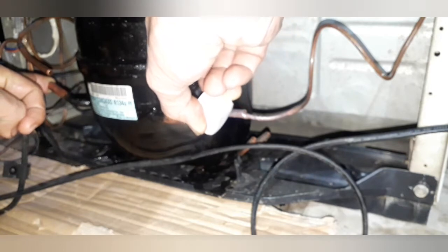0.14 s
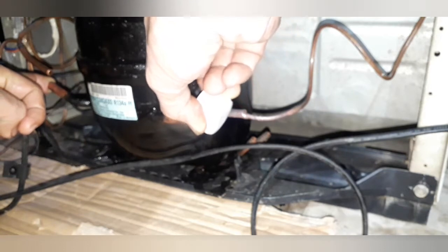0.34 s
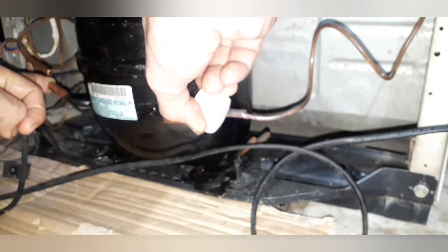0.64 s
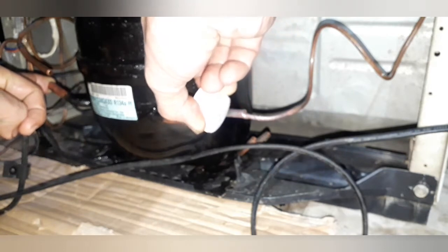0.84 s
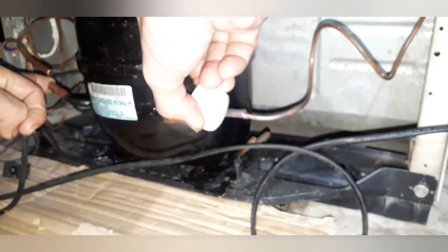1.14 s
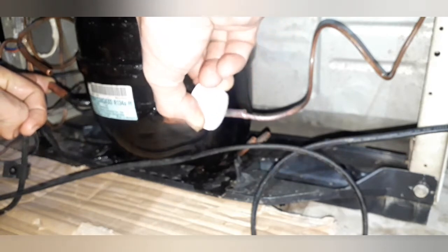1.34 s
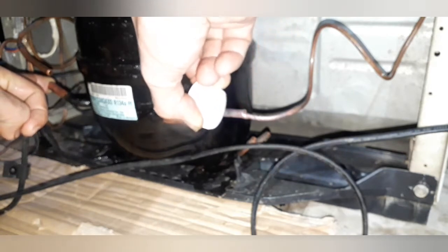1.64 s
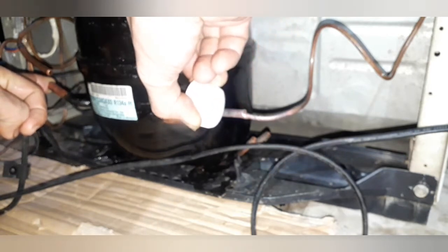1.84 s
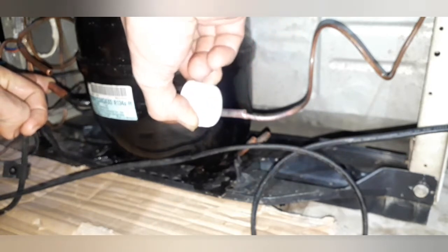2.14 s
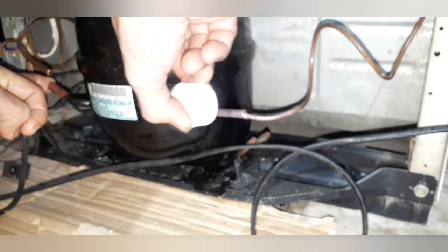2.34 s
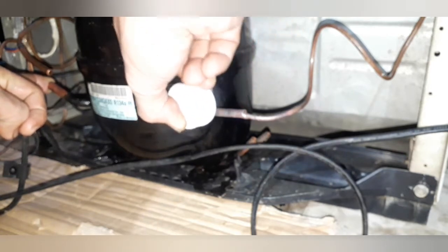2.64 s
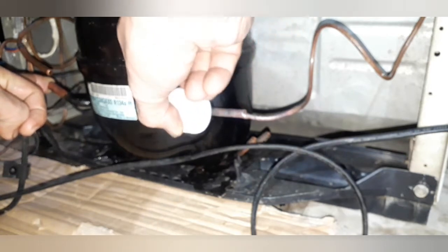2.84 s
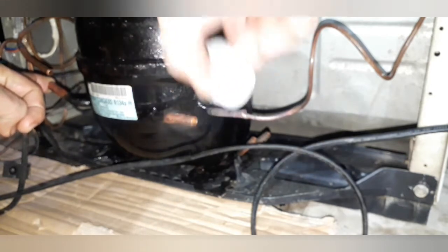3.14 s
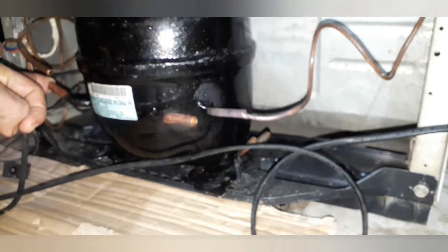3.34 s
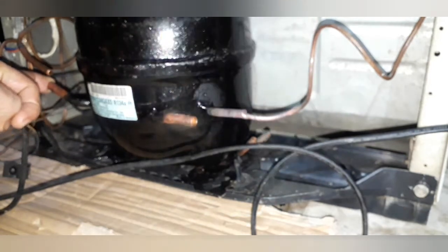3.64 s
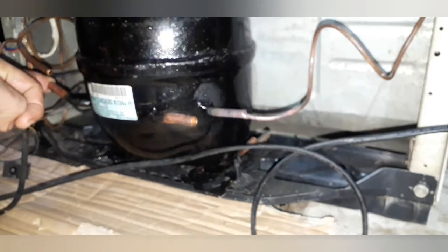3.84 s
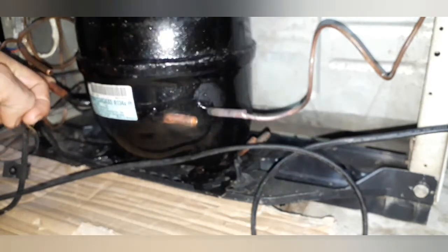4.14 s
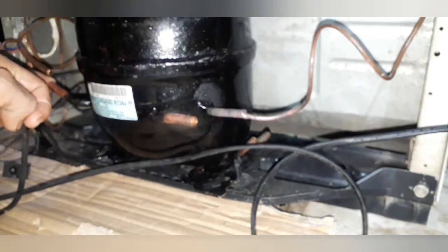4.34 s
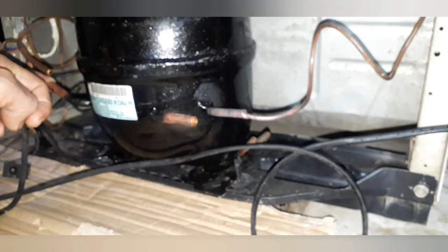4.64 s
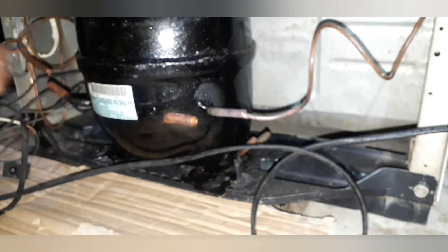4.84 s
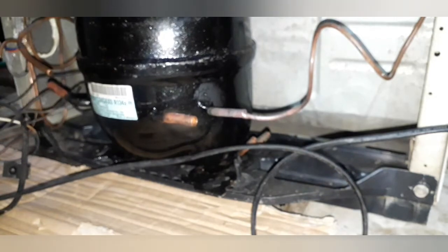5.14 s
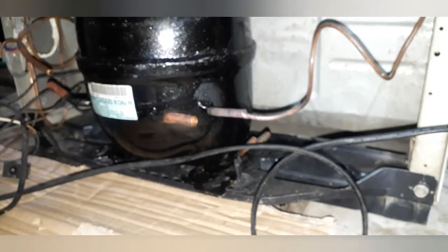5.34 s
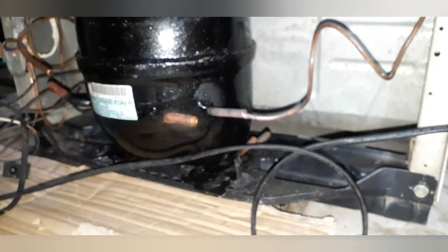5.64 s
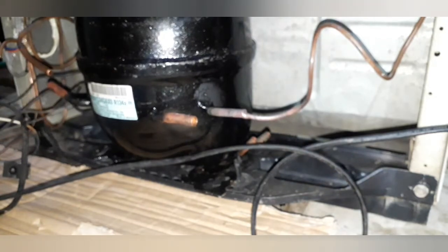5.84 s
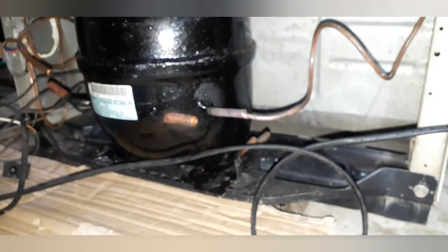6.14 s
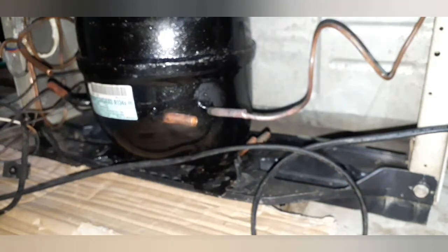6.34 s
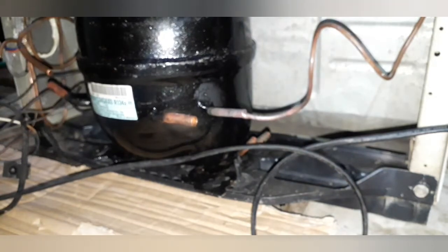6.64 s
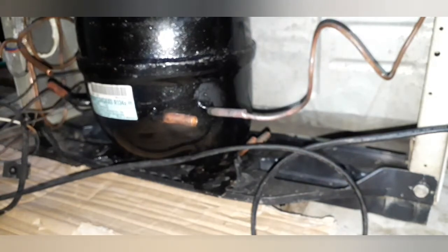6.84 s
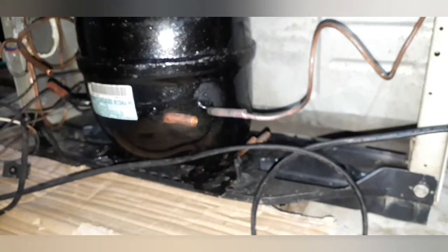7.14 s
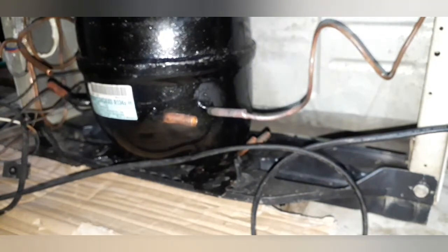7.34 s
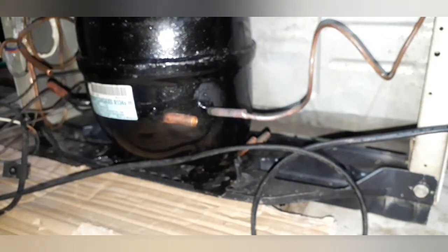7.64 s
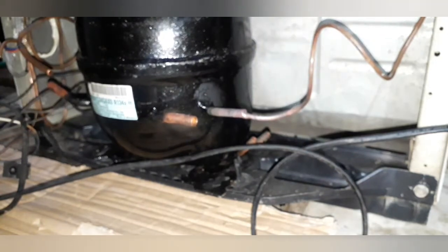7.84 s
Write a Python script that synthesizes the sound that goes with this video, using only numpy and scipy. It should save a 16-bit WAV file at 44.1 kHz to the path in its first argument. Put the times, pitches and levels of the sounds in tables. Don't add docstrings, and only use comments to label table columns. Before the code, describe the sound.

Close, loud hissing and rapid metallic buzzing from a running compressor, low motor hum beneath, brief handling clicks and dull knocks near the end.

```python
import sys
import numpy as np
from scipy import signal
from scipy.fft import rfft, irfft
from scipy.io import wavfile

SR = 44100
rng = np.random.default_rng(int(sys.argv[2]) if len(sys.argv) > 2 else 0)


def file_out(sig):
    cols = np.atleast_2d(sig).T
    lim = np.clip(cols, -1, 1)
    pcm = np.round(lim * 32767).astype(np.int16)
    wavfile.write(sys.argv[1], SR, pcm)


def linear_from_db(decibels):
    return 10 ** (np.asarray(decibels, float) / 20)


N = 352359
CONTROL = 40

# (frequency [Hz], level [dB], t60 [s])
SHELL_MODES = [(1436, -59, .045), (2140, -58, .06), (2225, -55, .07), (2463, -70, .085), (2692, -41, .09),
               (2861, -38, .09), (2960, -47, .05), (3045, -50, .04), (3309, -42, .045), (3389, -43, .024),
               (3859, -43, .012), (4559, -41, .012), (4690, -47, .09), (4890, -51, .022),
               (5195, -28.5, .026), (5296, -26, .059), (5417, -42, .014), (5739, -38, .061),
               (5800, -70, .064), (5932, -54, .09), (6014, -41, .051), (6155, -54, .029), (6596, -45, .012),
               (6760, -52, .042)]
# (delay [s], share of height [1])
BOUNCES = [
    (0, 1),
    (.00163, .9),
    (.0029, .53),
]
# (frequency [Hz], width [Hz], rms with both hands near [dB], rms with
# both gone [dB])
HISS_MODES = [(1301.7, 280, -61.5, -62), (1542, 260, -59.5, -59), (2060, 610, -58.5, -61.5),
              (2302, 25, -57.5, -59), (2345, 29, -55, -56.5), (2423, 250, -53, -53), (2457, 23, -69, -56),
              (2662.4, 220, -51.5, -68), (2965, 292, -52, -54), (3105, 510, -52.5, -49.5),
              (3470, 170, -53, -51), (3710, 77, -53, -52.5), (3832.5, 176, -44.5, -44.5),
              (4048, 339, -45.5, -41.5), (4190, 100, -49.5, -59.5), (4548, 330, -54, -53.5),
              (4750, 190, -47, -46), (4920, 80, -52, -64), (5024, 170, -45, -44), (5204, 100, -59, -53),
              (5327, 370, -45, -47.5), (5783, 244, -46.5, -44.5), (6010, 127, -54, -48.5),
              (6270, 110, -65, -58), (6434, 370, -49, -49.5), (6880, 204, -47, -47.5),
              (7146, 310, -44.5, -43.5), (7481, 153, -50.5, -46), (7800, 274, -52.5, -50.5),
              (7960, 150, -56, -51),
              (8202, 160, -48.5, -47), (8299, 290, -45.5, -48.5), (8625, 220, -50, -58),
             (8775, 183, -54, -46), (9084, 320, -48.5, -43.5), (9470, 430, -50.5, -58),
             (9700, 340, -46.5, -49.5), (9950, 280, -58, -49), (10120, 250, -56.5, -58),
             (10590, 310, -45.5, -44.5), (10710, 328, -48.5, -43.5), (11040, 290, -47, -43),
             (11330, 140, -53, -46), (11807, 290, -46.5, -45), (11958, 300, -48.5, -47),
             (12180, 125, -55, -57), (12540, 510, -47.5, -42.5), (12903, 410, -47.5, -48.5),
             (13170, 140, -56, -48.5), (13360, 160, -53, -55), (13530, 240, -52, -51),
             (13890, 290, -54, -53), (14240, 220, -46.5, -43), (14640, 290, -48, -47),
             (15090, 420, -47, -42), (15620, 450, -48, -60)]
# (knock [dB], shaft tone [dB], twice shaft [dB], standing wave [dB])
TUBE_HAND = (2.7, 1.5, 1.5, 0.8)
# (knock [dB], shaft tone [dB], twice shaft [dB], standing wave [dB])
CABLE_HAND = (0.2, 11.5, 6.5, -1)
# (centre [s], half length [s], knock dip [dB], knock gain after [dB])
LEAN = (6.32, .13, -7, 1.2)
# (time [s], peak level [dB], ring frequency [Hz], t60 [s])
TAPS = [(2.72, -27, 2500, 0.004), (2.7202, -32, 1950, .008), (2.79, -33.5, 2070, .01),
        (2.78, -26, 2850, .007), (2.7895, -24, 2770, 0.006), (2.829, -37, 2350, 0.0089),
        (2.869, -34.5, 2200, .005), (2.89, -37, 2500, .005), (2.921, -37, 2300, .005),
        (2.95, -45, 1300, 0.04), (4.771, -44, 1600, .012), (4.817, -43, 1330, .015),
        (4.829, -37, 1560, 0.02), (4.845, -41, 1670, .04), (4.893, -38, 1580, .025),
        (7.7987, -44, 1550, .03)]
# (time [s], peak level [dB])
THUMPS = [
    (7.218, -21),
    (7.811, -35),
    (7.836, -38),
    (7.862, -34),
    (7.907, -26),
]
# (frequency [Hz], level [dB], t60 [s])
BENCH_MODES = [(122.4, -3.5, 0.128), (196, -2.5, 0.076), (338, -9, 0.048), (503, -15, 0.033),
               (700, -18, .02), (1090, -12.5, 0.0246), (1330, -14, .01), (1600, -9.5, 0.024),
               (2000, -16, 0.011)]
# (order [1], level [dB])
FAR_ORDERS = [(1, -75), (2, -68), (3, -61), (4, -60), (5, -67), (6, -49), (8, -70), (9, -74), (10, -71),
              (12, -70)]
# (order [1], level [dB])
NEAR_ORDERS = [(4, -59), (9, -69), (10, -70), (11, -70), (12, -70), (13, -71), (14, -73), (16, -77)]
# (frequency [Hz], level [dB])
STRAY_LINES = [(142.8, -60), (148.6, -62), (201.2, -56), (227.1, -60), (243.4, -57), (269.3, -62),
               (301.8, -66), (395.8, -69), (437.9, -70), (564.7, -75), (792.5, -80)]
# (frequency [Hz], density [dB per Hz])
RUMBLE = [(20, -96), (38, -94.5), (58, -88), (89, -75.5), (136, -73.5), (207, -74.5), (257, -71.5),
          (317, -77.5), (370, -82), (460, -75.5), (599, -82.5), (741, -87.5), (1000, -88.5), (1500, -100)]
# (centre [s], gain [dB])
SWELLS = [
    (2.98, 8.5),
    (3.55, 1.5),
    (4.4, 5),
    (5.7, 6),
    (6.65, 9.5),
    (7.0, 4.5),
    (7.95, 3),
]

SHAFT_HZ, FAR_HZ, NEAR_HZ = 49.538, 42.17, 48.24


def rms_one(x):
    return x / np.sqrt(np.mean(x ** 2) + 1e-20)


def drift(rate_hz):
    r = np.exp(-2 * np.pi * CONTROL * rate_hz / SR)
    settle = 2000
    white = rng.standard_normal(N // CONTROL + 2 + settle)
    slow = signal.lfilter([1], [1, -2 * r, r * r], white)[settle:]
    return np.repeat(rms_one(slow), CONTROL)[:N]


def ramp(start_s, length_s):
    return np.clip((np.arange(N) / SR - start_s) / length_s, 0, 1)


def ring(force, hz, t60):
    r = np.exp(-np.log(1000) / (t60 * SR))
    w = 2 * np.pi * hz / SR
    return signal.lfilter([0, np.sin(w)], [1, -2 * r * np.cos(w), r * r], force + 1e-18)


def noisy_mode(white, hz, width_hz):
    r = np.exp(-np.pi * width_hz / SR)
    section = [1, 0, -1, 1, -2 * r * np.cos(2 * np.pi * hz / SR), r * r]
    return rms_one(signal.sosfilt([section, section], white))


def clicks_at(seconds, heights):
    at = np.asarray(seconds)[:, None] * SR
    near = at.astype(int) + np.arange(-7, 9)
    offset = near - at
    pulse = np.sinc(offset) * np.cos(offset * np.pi / 16) ** 2
    out = np.zeros(N + 20)
    np.add.at(out, near, np.reshape(heights, (-1, 1)) * pulse)
    return out[:N]


def tone(hz, level_db, wobble_hz, wobble_db):
    phase = 2 * np.pi * (rng.random() + np.cumsum(hz + wobble_hz * drift(0.989)) / SR)
    return np.sqrt(2) * linear_from_db(level_db + wobble_db * drift(0.64)) * np.sin(phase)


def valve(freed_db, wander_s, uneven_db):
    s = np.arange(.0022, N / SR - .01, 1 / SHAFT_HZ)
    s = s + wander_s * drift(1.0)[(s * SR).astype(int)]
    heights = linear_from_db(uneven_db * rng.standard_normal((len(s), len(BOUNCES))))
    landing, *later = [clicks_at(s + delay_s, share * heights[:, k])
                       for k, (delay_s, share) in enumerate(BOUNCES)]
    bounces = sum(later)
    low = linear_from_db(.3 + 0.15 * freed_db) * (landing + 0.76 * bounces)
    high = linear_from_db(-1.2 + freed_db) * (landing + bounces)
    out = np.zeros(N)
    for k, (hz, level_db, t60) in enumerate(SHELL_MODES):
        force = low if hz < 4000 else high
        out += (-1) ** k * linear_from_db(level_db) * ring(force, hz, t60)
    return out


def gas(gone, flicker_db, surge_db):
    white = rng.standard_normal((4, N))
    surge = drift(6.5)
    freed = np.interp(gone, [0, 1, 2], [0, 0.47, 1])
    out = np.zeros(N)
    for k, (hz, width_hz, near_db, gone_db) in enumerate(HISS_MODES):
        level_db = near_db + (gone_db - near_db) * freed + flicker_db * drift(5.5)
        gain = np.repeat(linear_from_db(level_db[::CONTROL]), CONTROL)[:N]
        out += gain * noisy_mode(white[k % 4], hz, width_hz)
    return linear_from_db(.2 + surge_db * surge) * reflections(out, gone, echo_db=-8.5)


def reflections(x, gone, echo_db):
    out = x.copy()
    for place in range(3):
        paths = np.zeros(int(.025 * SR))
        lags = rng.integers(250, len(paths), size=40)
        paths[lags] = rng.standard_normal(len(lags)) * linear_from_db(-300.0 * lags / SR)
        paths /= np.sqrt(np.sum(paths ** 2))
        share = np.sqrt(np.clip(1 - np.abs(gone - place), 0, 1))
        out += share * linear_from_db(echo_db) * signal.oaconvolve(x, paths)[:N]
    return out / np.sqrt(1 + linear_from_db(2 * echo_db))


def shaft_hum(shaft_db, twice_db):
    return tone(SHAFT_HZ, shaft_db, .05, .8) + tone(2 * SHAFT_HZ, twice_db, .05, 1.6)


def finger_taps():
    out = np.zeros(N)
    for s, peak_db, hz, t60 in TAPS:
        scratch = rng.standard_normal(300) * np.exp(-np.arange(300) / 25)
        burst = np.r_[scratch, np.zeros(3000)]
        tap = ring(np.diff(ring(burst, hz, 0.0027)), hz, t60)
        out[int(s * SR):][:len(tap)] += linear_from_db(peak_db) * tap / np.abs(tap).max()
    return out


def bench_knocks():
    s, peak_db = np.transpose(THUMPS)
    below_db = peak_db.max() - peak_db
    bright = linear_from_db(-2.2 * below_db)
    small = linear_from_db(0.63 * below_db.clip(0, 6))
    out = np.zeros(N)
    for k, (hz, level_db, t60) in enumerate(BENCH_MODES):
        if hz > 600:
            weight = bright
        elif hz > 150:
            weight = small
        else:
            weight = 1
        out += (-1) ** k * ring(clicks_at(s, linear_from_db(peak_db + level_db) * weight), hz, t60)
    return out


def handling():
    high_pass = signal.butter(4, 75, "high", fs=SR, output="sos")
    return signal.sosfilt(high_pass, finger_taps() + bench_knocks())


def rustle():
    start_s, attack_s, hold_s, release_s = 4.76, .04, .12, .2
    shape = ramp(start_s, attack_s) * (1 - ramp(start_s + attack_s + hold_s, release_s))
    grains = rng.standard_normal(N) * linear_from_db(3.3 * drift(60))
    return linear_from_db(-56.5) * shape * noisy_mode(grains, 1400, 700)


def other_motors():
    far = [(order * FAR_HZ, db) for order, db in FAR_ORDERS]
    near = [(order * NEAR_HZ, db) for order, db in NEAR_ORDERS]
    return sum(tone(hz, db + .8, .2, 1.) for hz, db in far + near + STRAY_LINES)


def swells():
    t = np.arange(N) / SR
    width_s = 0.14
    return sum(gain_db * np.exp(-.5 * ((t - s) / width_s) ** 2) for s, gain_db in SWELLS)


def rumble(standing_db):
    hz = np.maximum(np.fft.rfftfreq(N, 1 / SR), 1)
    corner_hz, density_db = np.transpose(RUMBLE)
    colour_db = np.interp(np.log(hz), np.log(corner_hz), density_db, right=-140)
    spectrum = rfft(rng.standard_normal(N)) * linear_from_db(colour_db) * np.sqrt(SR / 2)
    wave = noisy_mode(rng.standard_normal(N), hz=165, width_hz=26)
    return irfft(spectrum, N) + linear_from_db(standing_db - 0.5) * wave


def scene():
    tube, cable = ramp(2.92, 0.47), ramp(4.73, .06)
    knock_db, shaft_db, twice_db, standing_db = (a * tube + b * cable for a, b in zip(TUBE_HAND, CABLE_HAND))
    lean_s, half_s, dip_db, after_db = LEAN
    clear = ramp(lean_s, half_s)
    knock_db = knock_db + dip_db * (ramp(lean_s - half_s, half_s) - clear) + after_db * clear
    mono = valve(knock_db, wander_s=.00003, uneven_db=0.7)
    mono = mono + gas(tube + cable, flicker_db=0.93, surge_db=0.28)
    mono = mono + shaft_hum(-72 + shaft_db, -58.5 + twice_db)
    mono = mono + handling() + rustle() + other_motors()
    mono = mono + rumble(-51 + standing_db + swells())
    return np.stack([mono, mono])


def top_cut(x):
    return signal.sosfilt(signal.butter(12, 16760, fs=SR, output="sos"), x)


def record(dry):
    low_pass = signal.ellip(10, .2, 40, 15750, fs=SR, output="sos")
    mix = signal.sosfiltfilt(low_pass, dry)
    return top_cut(mix)


dry = scene()
out = record(dry)
file_out(out)
```